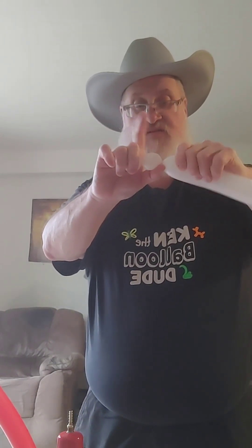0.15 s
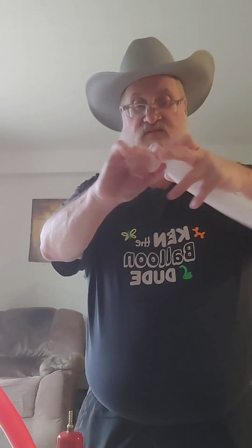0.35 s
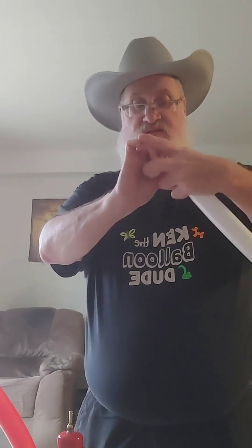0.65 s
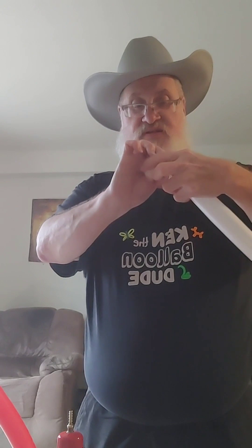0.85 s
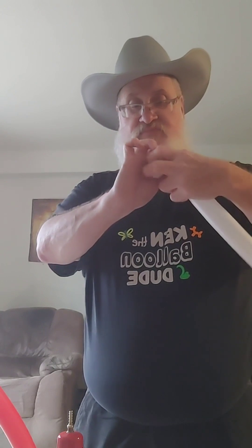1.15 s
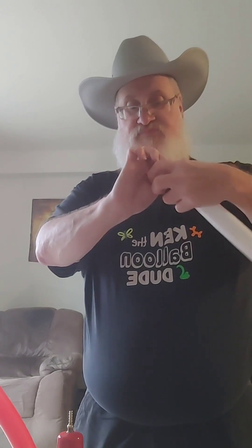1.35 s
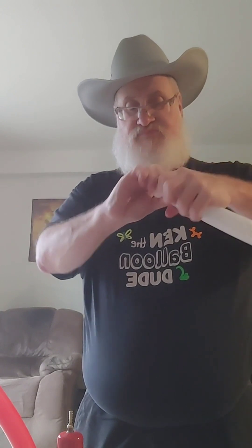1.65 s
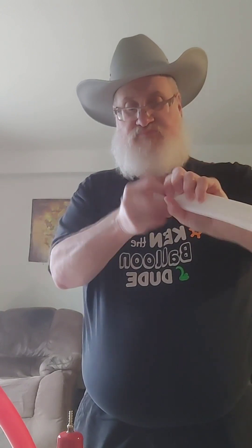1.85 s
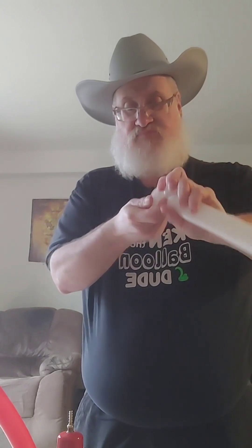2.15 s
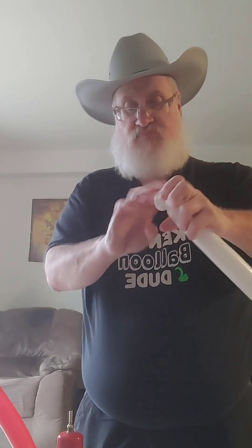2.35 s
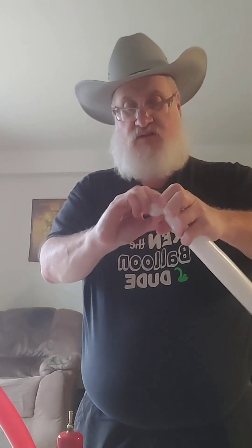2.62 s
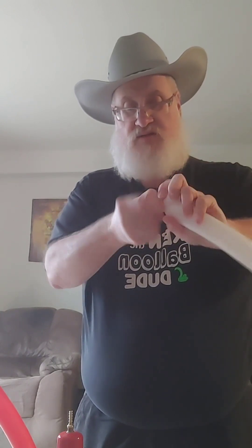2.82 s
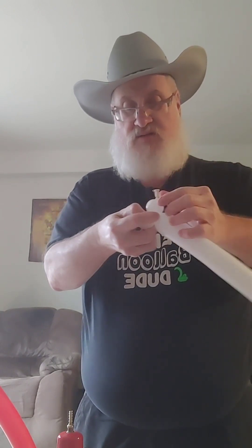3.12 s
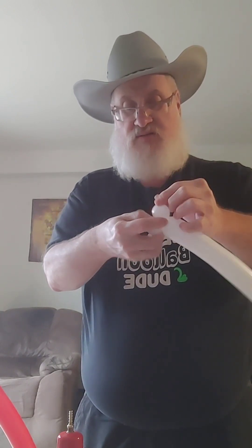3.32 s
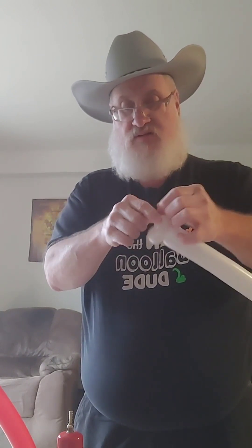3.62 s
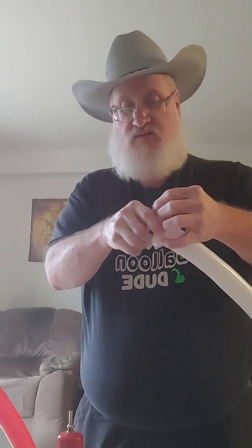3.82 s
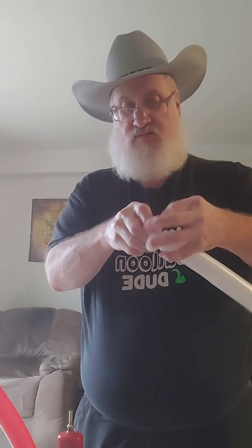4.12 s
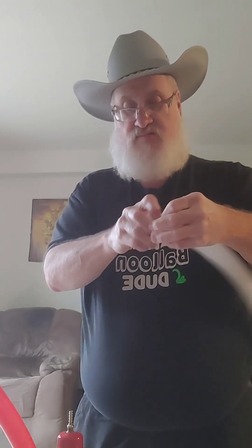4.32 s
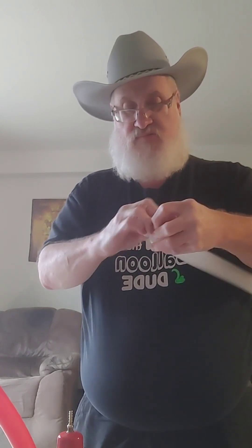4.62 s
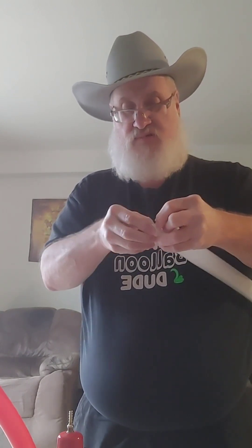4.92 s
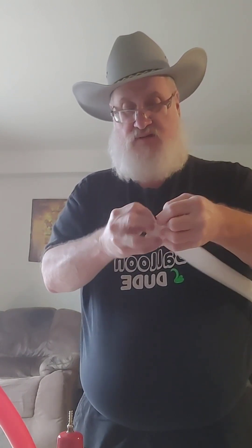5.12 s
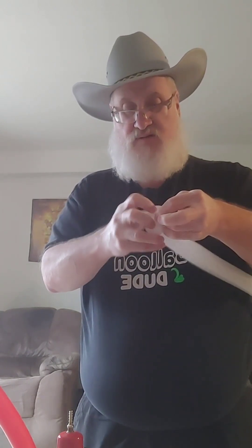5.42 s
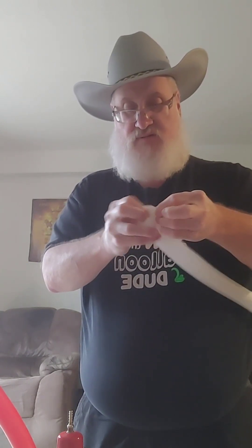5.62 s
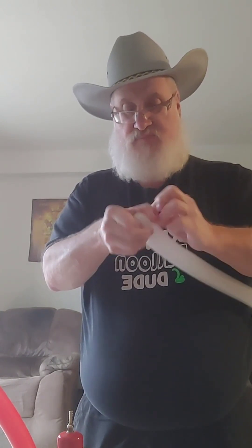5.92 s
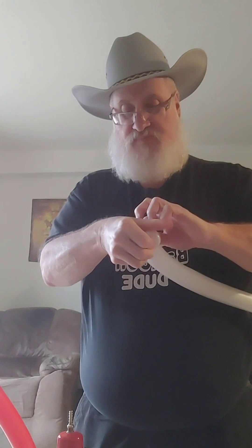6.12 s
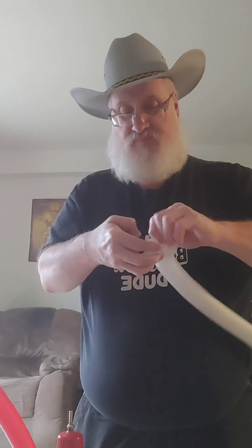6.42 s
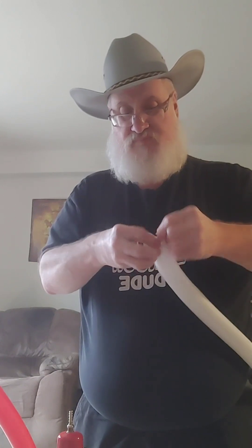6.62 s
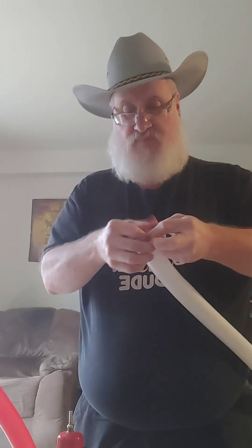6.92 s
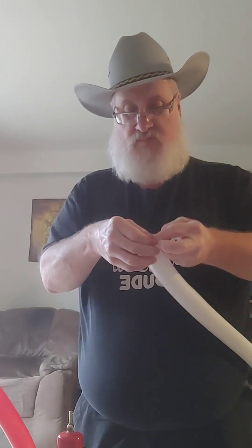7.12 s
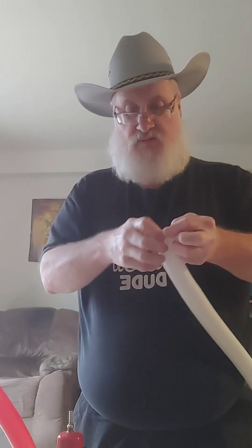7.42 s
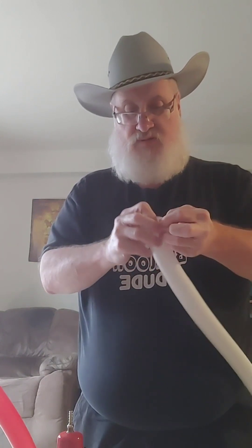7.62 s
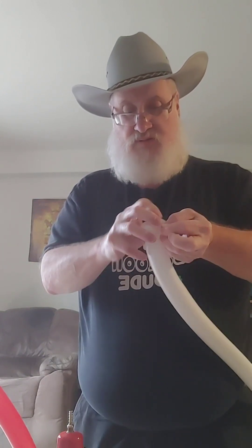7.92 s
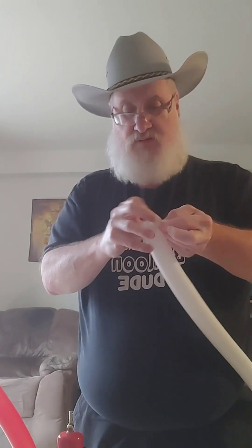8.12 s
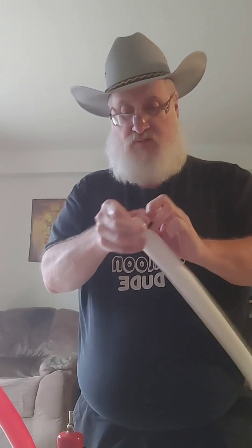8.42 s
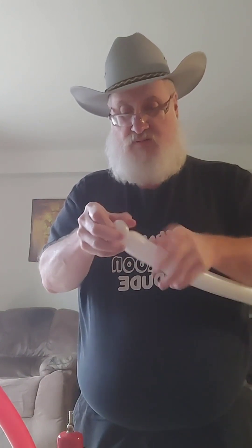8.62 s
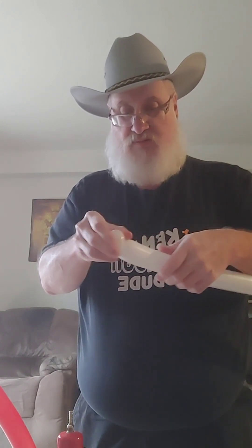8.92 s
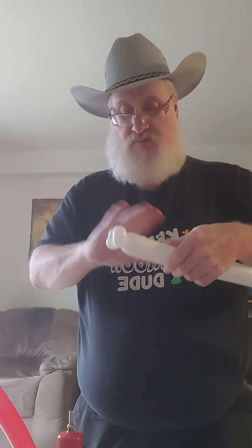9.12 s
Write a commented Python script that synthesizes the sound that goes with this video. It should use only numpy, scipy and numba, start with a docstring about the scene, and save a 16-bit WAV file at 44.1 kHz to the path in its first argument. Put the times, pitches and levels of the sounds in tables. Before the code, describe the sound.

Close stereo pickup of a long latex balloon being twisted and knotted by hand in a small, lightly echoing living room. From 0 to 2.2 s, short scratchy rubs follow one another several times a second, fairly loud, mid-pitched and hollow, with snaps at about 0.2, 1.0, 1.6 and 2.0. A brief lull near 2.3 leads to more rubs and a cluster of snaps from 2.4 to 3.3. Around 3.4 to 3.7 it thins out to faint creeping and tiny high squeaks. From 3.9 to 8.4 the strokes are lighter, drier and crisper, irregular, with rubbery creaks and sharper snaps near 4.2, 5.2, 6.7 and 8.2. At 8.5 the strongest snap comes with a short low yelp, then small chirps and rubs until 9.0. It fades almost to silence, with a last faint rustle after 9.2. Very quiet room air and barely audible hum run underneath.

```python
"""Long latex balloon twisted and knotted by hand in a living room.
Fingers stick and slip on the taut skin: random slip trains drive skin, air tube and creases (scratchy strokes).
Single jerks give snaps, quick runs of them creaks; gliding tones give a few short squeals.
Ceiling and walls answer with echoes, a diffuse tail and standing waves.
Shaped noise and two wavering tones add room air and a faint electric hum."""
import sys
import numpy as np
from scipy import signal
from scipy.fft import rfft, irfft, next_fast_len
from scipy.io import wavfile
from scipy.ndimage import uniform_filter1d, map_coordinates
from numba import njit

SR = 44100
rng = np.random.default_rng(int(sys.argv[2]) if len(sys.argv) > 2 else 0)


def store_wav(level_fs):
    """Save 16-bit WAV to argv[1]."""
    pcm = np.round(np.clip(np.atleast_2d(level_fs), -1, 1) * 32767)
    wavfile.write(sys.argv[1], SR, pcm.T.astype(np.int16))


N = 408220

# finger strokes: (start [s], length [s], relative rubbing level at mid-stroke [dB], swell start to end [dB],
# air tube drive [dB], sharpness = crease drive [dB], resonance of the gripped patch [Hz],
# low panel drive [dB], high panel drive [dB]); drives are relative to the rubbing level
STROKES = [(0.066, 0.068, -35.0, 10, -3.5, -2.5, 1910, -9, -18),
           (0.183, 0.033, -38, -3, -2, -0.34, 1880, -17, -5),
           (0.216, 0.086, -47.5, -9, 3, 0.01, 1440, -16, -20),
           (0.302, 0.055, -57.0, -2, -2, -2, 1250, 0, -18),
           (0.378, 0.12, -50.5, -1, -24, -6, 2153, -6, -27),
           (0.502, 0.044, -51.0, 1, -15, 0.76, 2162, -1, -7),
           (0.549, 0.019, -46, -1, -1, -1.5, 1116, -21, -6),
           (0.61, 0.035, -53.0, 0, -20, 2.5, 1987, -4, -7),
           (0.681, 0.037, -38.0, -1, -19, -6.0, 1650, -19, -10.5),
           (0.758, 0.039, -41.5, 9, -29, -6, 1359, -6, -9),
           (0.813, 0.076, -45.5, 1, -10, -2.0, 1910, -2, -8),
           (0.917, 0.061, -41.5, -3, -17, -6, 1650, -16, -6),
           (0.984, 0.037, -35.5, -3, -4, -8.0, 1110, -12, -16),
           (1.027, 0.087, -52, 0, -8, -6, 1806, -2, -9),
           (1.13, 0.065, -40.5, 2, -36, -5.5, 1903, -2, -10.5),
           (1.185, 0.055, -44, -0.5, -7, -3.5, 1449, -20, -6),
           (1.252, 0.095, -49, 7, -39, 1.0, 2343, -6, -7.5),
           (1.388, 0.07, -46, 3, -37, -23, 2443, -5.5, -35),
           (1.492, 0.057, -41.5, 3, -16, -4, 1784, -14, -8),
           (1.535, 0.025, -44.5, 2, -4, -4.5, 1514, 3.5, -11),
           (1.598, 0.032, -42, -6, -22, -12.0, 1505, -15, -19),
           (1.646, 0.033, -46.0, 2, -29, -0.35, 1900, -9, -20),
           (1.683, 0.063, -52.0, 1, -31, 4.5, 2270, -3, -19),
           (1.74, 0.13, -55.5, 4, -20, -1.44, 2525, 1.5, 2),
           (1.894, 0.062, -50.5, -3, -24, 0.72, 2012, -4, -8),
           (1.972, 0.11, -38.0, 4, -9.5, -2.5, 1757, -8, -11),
           (2.095, 0.1, -45, -11, -11, -1.5, 2310, 0, -5),
           (2.176, 0.075, -45.5, 10, -1.5, -0.85, 1697, -8, -7),
           (2.447, 0.041, -39.5, 3.5, -4, -7, 1610, -22, -11),
           (2.511, 0.015, -50.5, -6, -3, 15, 2199, -12, -17),
           (2.61, 0.12, -48, 10, -31, 1.2, 2448, -24, -11), (2.735, 0.072, -54, 11, -5, 2.5, 1909, 3, -12),
           (2.9, 0.054, -38.5, 2, -19, -6, 2245, -11.5, -10),
           (3.106, 0.077, -51, -3, -8, 3.5, 1949, -3, -18), (3.213, 0.087, -56, 13, -27, 5, 2329, 0.5, -9),
           (3.339, 0.1, -54.5, -4, -40, -1.16, 2282, -4.5, -20),
           (3.725, 0.041, -50.0, 8, -4, -0.43, 2693, -8, -0.5),
           (3.799, 0.04, -54.0, 0, -17, -2.5, 2685, -29, -20),
           (3.878, 0.039, -52.0, 1, -16, -1.67, 2650, -27, 2.5),
           (3.95, 0.077, -53.5, -2.5, -1.5, 4.5, 2780, -26, 2),
           (4.081, 0.2, -57.5, 2, 2, 11, 2583, -10, 0.5), (4.292, 0.1, -56, -7.5, -22, 9.0, 2203, -5, -6),
           (4.403, 0.062, -44, 1, -15, 7.5, 2426, -2.5, 0),
           (4.474, 0.093, -53, -4, -10, 5.5, 2200, -3, 2.5),
           (4.618, 0.02, -54.0, -0.5, -13, 4.5, 2089, -1, 4),
           (4.637, 0.064, -47, 2, -10.5, 3.5, 2423, -0.5, -2),
           (4.73, 0.052, -44, -2, -25, 3.5, 2574, -3.5, -3),
           (4.837, 0.041, -48, -1, -13, -2.5, 2075, -4, -9),
           (5.052, 0.055, -50.0, 2, -19, 7.5, 2505, -15, 2.5),
           (5.14, 0.07, -51.0, 5, -23, 2.01, 2710, -7, -4),
           (5.228, 0.095, -46.0, -5, -15, 4.5, 2827, -32, -16),
           (5.451, 0.033, -55, -0.5, -28, 3.5, 2313, -12, -2),
           (5.514, 0.054, -44, -3, -14.5, 0.5, 1901, -19, -6.5),
           (5.595, 0.04, -50.5, 0, -8, -5.5, 2100, -11, -19),
           (5.644, 0.11, -49.5, 1, -16, 3.5, 2300, -22, -14),
           (5.743, 0.083, -45, -2.5, -6.5, 2.5, 1984, -17, -11),
           (5.974, 0.11, -56, 0.5, -14, 1.12, 2399, -10, -5.5),
           (6.091, 0.04, -47.5, 3, -22, -3.5, 2559, -7, -8),
           (6.191, 0.035, -51.5, 0, -8, -8.5, 2444, -2, -12),
           (6.225, 0.025, -47.0, -2.5, -23, -7.5, 2448, -22, -26),
           (6.287, 0.14, -56.0, 1, -9, -0.5, 2249, -13, -15),
           (6.434, 0.13, -59.5, -6, -12, 9, 2632, -1, -2),
           (6.59, 0.099, -55.5, -9, -35.5, 5, 2764, -8, -11),
           (6.68, 0.087, -51.5, -13, -13, 7, 2318, 2, -1),
           (6.761, 0.067, -47.5, -2, -15, 6.5, 2120, -5, -3),
           (7.044, 0.043, -52.5, -9, 3.5, -6.0, 2400, 0, 3),
           (7.122, 0.033, -49.5, 3, -14, -0.2, 2319, -12, -16),
           (7.171, 0.061, -53, -1.5, -1.5, -1.17, 2005, 2, -1),
           (7.262, 0.04, -58.0, 0, -21, 2.5, 2696, -7, 7),
           (7.397, 0.038, -59.5, -3, -7.5, 9.5, 2446, -20.5, -11),
           (7.546, 0.076, -55.0, 9, -0.5, -8.5, 2373, -3, -19),
           (7.644, 0.044, -50, 2, -4, 1.93, 2401, -3, 1),
           (7.699, 0.097, -46.0, 1.5, -12, 2.5, 2202, -6, -4.5),
           (7.813, 0.033, -46.5, -1.5, -19, 1.5, 2498, -6, -9),
           (7.869, 0.034, -53.5, -2.5, -24, 10.5, 2400, -18, 1),
           (7.946, 0.036, -58.0, 0, -17, 8.5, 2511, -17, -3),
           (8.03, 0.073, -55, 2, -11, -9.5, 1999, -2, -22),
           (8.118, 0.11, -51.5, 10, -10, 4, 2381, 0.5, -11),
           (8.272, 0.029, -46.5, 3.5, -2.5, -3.5, 2480, -18, -12),
           (8.346, 0.14, -51.5, -5, -8.5, 0.33, 2104, -5, -6),
           (8.494, 0.085, -43.0, -18, 0.5, -7.5, 1399, -7, -11),
           (8.591, 0.054, -45.5, -13, -7, 2.4, 2783, -23, -3.5),
           (8.66, 0.047, -53.5, 0, -8, 0.2, 2581, -25, -11),
           (8.778, 0.043, -48, -2, -19, -12.5, 1445, -14, -3),
           (8.887, 0.031, -48.5, -1.5, -6, 1, 1899, 0, -3),
           (8.991, 0.0087, -50, -1, -37, 1.5, 2677, -32, -28)]
ATTACK_S, RELEASE_DB_PER_S = .012, 600  # a finger takes hold, and lets go
# light creeping of the holding fingers: (time [s], relative level [dB])
CREEP_LEVEL = [(0.0, -53.0), (1.45, -57.0), (1.95, -55.0), (2.25, -45.0), (2.29, -85.0), (2.42, -69),
               (2.5, -59.0), (3.42, -56.0), (3.52, -73), (3.62, -68), (3.68, -61), (3.8, -55.0),
               (4.9, -55.0), (4.99, -62.0), (5.1, -60.0), (5.4, -60.0), (6.9, -59.0), (7.34, -57),
               (7.44, -66), (7.5, -57), (8.62, -55), (8.73, -63.5), (8.84, -57), (9.01, -59.5),
               (9.06, -85.5), (9.2, -74.5), (9.26, -51.5)]
CREEP_TUBE_DB, CREEP_SHARP_DB, CREEP_HZ = -13.5, -0.5, 2140  # tube drive, sharpness, patch resonance
CREEP_SWING_DB, CREEP_SHIFTS_PER_S = 3, 22  # random shifts of the grip
# creeping drive of each panel: (low [dB], high [dB])
CREEP_PANELS_DB = [-12.5, -12.5]
# slip rate at one rubbing level and 0 dB sharpness; rises in level and in sharpness that double it
SLIPS_PER_S, SLIPS_AT_DB, DOUBLING_DB, SHARP_DOUBLING_DB = 295, -47, 26, 7
# stretched skin panels beside the grip: (resonance [Hz], damping [0-1], relative level [dB])
SKIN_PANELS = [(1494, 0.3, -3), (4083, 0.28, 2)]
# response of the skin: (frequency [Hz], relative level [dB])
SKIN_SPECTRUM = [(100, -34.5), (600, -70), (950, 11.5), (1400, 8.5), (1820, 2.5), (2300, 9), (2850, 12),
                 (3600, 0.5), (5000, -13), (10000, -60.5)]
# response of the air tube: (frequency [Hz], relative level [dB])
TUBE_SPECTRUM = [(30, -33), (200, -23), (320, -11.5), (430, 2.5), (520, 6), (630, 3), (780, -3.5),
                 (1050, 7.5), (1350, -95.5), (2500, -37.5)]
# response of the creases under rubbing: (frequency [Hz], relative level [dB])
CREASE_SPECTRUM = [(800, -89.5), (2300, -7.5), (3100, -24), (3800, -0.5), (4700, -6.5), (6500, -1.5),
                   (8000, -8), (9200, -16.5), (11600, -10), (12800, -18), (16000, -32.5)]

# snaps, single large slips: (time [s], relative level on the taut skin [dB], then relative to it:
# air tube [dB], creases [dB], push of air [dB])
SNAPS = [(0.1475, -21, 0, -24, -49.5), (0.179, -13, -10, -5, -31), (0.1913, -16, -5, -9, -43),
         (0.5605, -30.5, -10, -8, -40), (0.621, -27.5, -45, -3, -22), (0.6715, -36, -29, -8, -45),
         (0.988, -20, -6, -11, -45), (1.0077, -25, -1, -2, -46), (1.5456, -23, -5, -16, -41),
         (1.5548, -21, -7, 1, -38), (1.5478, -25, -9, -7, -41), (1.6019, -20.5, -7.5, -9, -53),
         (1.6028, -20, -12, -8.5, -50), (1.6779, -19.5, -35, -0.5, -45), (1.693, -22, -29.5, 0.5, -43),
         (1.7086, -21.5, -38, -1.5, -43), (2.0126, -30.5, -27, 18, -5), (2.1523, -28.5, -11, 7.5, -35),
         (2.435, -27, -9, -14, -27), (2.483, -20, -7, -16, -30), (2.613, -36, -8, 17.5, -15),
         (2.6962, -32, -30, -16, -42), (2.7145, -15.5, -19, 0.5, -22), (2.7746, -17, -17, 2, -30),
         (2.8659, -26, -38, -4, -42), (2.9002, -34, -37, -12, -44), (2.9058, -33, -26, -9, -44),
         (2.9202, -27.5, -19, -4, -41), (2.9347, -29, -24, -18, -44), (3.0691, -25, -17, 8, -17),
         (3.2038, -23, -11.5, -6, -43), (3.3294, -26, -46, -9, -44.5), (3.9607, -32, -15, 11.5, -30),
         (3.9757, -44, -10, 15, -36.5), (4, -37.5, -11, 16, -21), (4.0238, -36, -12, 0, -28),
         (4.0506, -29, -32, 6, -40), (4.1733, -16.5, -15, 2.5, -17), (4.3087, -29, -13, 9.5, -28),
         (4.36, -33, -21, 12, -10), (4.4204, -28.5, -25, 2.5, -37), (4.4372, -21, -31, 2, -18),
         (4.4463, -22.5, -17, -2, -29), (4.6663, -23, -23, 6.5, -25.5), (4.718, -26, -25, -7, -42),
         (4.7277, -23.5, -22, -5.5, -43.5), (4.9391, -27, -35, -3.5, -36.5), (5.1032, -33, -31, -4, -37.5),
         (5.2115, -14, -15.5, 3, -18.5), (5.6208, -31, -14, -14, -40), (5.6426, -29, -12, 3.5, -37),
         (5.687, -24, -27, -2.5, -50), (5.692, -21, -41, 2, -50), (5.6963, -32, -32, -2, -45),
         (5.7754, -26.5, -16, -1, -36), (5.826, -35, -10, 13.5, -16), (5.8681, -29, -12, 4.5, -23),
         (5.899, -24.5, -10, -6.5, -28), (5.9093, -29, -5, -1, -38), (6.2295, -35, -24, -5, -40),
         (6.3603, -34, -18, -11, -33), (6.4197, -43, -25, 6.5, -40), (6.4455, -22, -39, 0.5, -51),
         (6.595, -31.5, -39.5, 10.5, -32), (6.525, -35, -35, 7, -40), (6.6118, -44, -34, -5, -40),
         (6.6238, -38, -33, -5, -41.5), (6.6488, -26.5, -31, 7, -38), (6.6842, -11, -22.5, 1, -34),
         (6.784, -21.5, -16.5, 10.5, -23), (7.0073, -32.5, -18, -3.5, -40), (7.0495, -34, -6, -11, -40),
         (7.0639, -26, -24, 1.5, -22), (7.218, -23.5, -19, 5, -48), (7.2233, -27.5, -20, 6.5, -40),
         (7.5856, -39, -20, -8.5, -40), (7.613, -30, -25, -5.5, -38), (7.6449, -26, -18, -7, -36),
         (7.6928, -24.5, -18, -5.5, -36), (7.7103, -23, -28, -7.5, -35), (7.8772, -28.5, -28, 1, -38),
         (7.9851, -29.5, -14, -8, -40), (8.0168, -35.5, -19, -13, -40), (8.0588, -29.5, -28, -8, -42),
         (8.1194, -17.5, -41, -7.5, -49), (8.134, -18.5, -28, 5, -46), (8.1964, -19, -35, -3, -45),
         (8.2483, -13.5, -24, 5.5, -26), (8.3961, -29.5, -15, -7, -37.5), (8.483, -8, -6, -16, -30.5),
         (8.4859, -13, -3.5, -4.5, -39), (8.6501, -41, -19, 1, -40), (8.8948, -21.5, -22, -10.5, -40),
         (9.0054, -40, -20, 0, -40)]
# response of a taut fold before tilting: (frequency [Hz], relative level [dB])
FOLD_SPECTRUM = [(100, -65), (650, -22.5), (1050, -1), (1400, 7), (1850, 0), (2300, 8), (2680, 10.5),
                 (3150, 4.5), (4000, 4.5), (10000, -80.5)]
# crack of the creases in a snap: (frequency [Hz], relative level [dB])
CRACK_SPECTRUM = [(800, -62.5), (2300, -9.5), (3100, -8.5), (3800, -1), (4700, -1), (6500, -0.5),
                  (8000, -3.5), (9200, -11.5), (11600, -8), (12800, -19.5), (16000, -27)]
# puff of air from a snap: (frequency [Hz], relative level [dB])
PUFF_SPECTRUM = [(20, -32), (60, -29), (130, -22.5), (260, -22), (420, -30), (900, -19.5), (2000, -53.5)]
# creaks, quick runs of slips: (start [s], length [s], rate [slips/s], relative base level on the skin [dB],
# air tube relative to the skin [dB])
CREAKS = [(0.134, 0.026, 250, -23, -9.5), (0.207, 0.017, 210, -31, -15), (0.759, 0.036, 170, -30.5, -10),
          (1.176, 0.049, 140, -33, -24), (1.62, 0.037, 160, -36, -15), (2.05, .04, 167, -28, -8),
          (2.444, 0.051, 145, -34.5, 2), (3.882, 0.033, 244, -41, -25), (4.491, 0.019, 210, -34, -19),
          (4.68, .026, 169, -36.5, -21), (4.847, 0.043, 222, -31, -19.5), (5.749, 0.025, 170, -26, -16),
          (5.811, 0.0221, 205, -35, -10.5), (5.916, 0.027, 110, -30, -6.5), (6.29, .035, 135, -39.5, -10),
          (6.9266, 0.038, 190, -30.5, -7.5), (7.18, 0.019, 129, -32, -15), (7.3195, 0.032, 141, -30.5, -13),
          (7.49, 0.033, 121, -33, -7.5), (7.641, 0.037, 166, -32, -19.5), (7.698, 0.11, 202, -30.5, -12),
          (7.818, 0.029, 230, -30, -19), (8.297, 0.019, 180, -30, -12), (8.784, .042, 130, -43, -17),
          (8.886, 0.028, 201, -30, -4.5)]
CREAK_CREASE_DB, CREAK_PUSH_DB = -5.5, -41  # relative to the skin
# slips locked to a tone: (start [s], length [s], first pitch [Hz], last pitch [Hz],
# relative level [dB], roughness [factor])
SQUEALS = [(0.133, 0.02, 946, 950, -32.5, 0.57), (0.765, 0.018, 1110, 1290, -41, 0.86),
           (0.875, .022, 1326, 1407, -42, 0.22), (0.989, 0.037, 1129, 1003, -38.5, 0.87),
           (1.142, 0.0096, 2060, 2490, -35, 0.66), (1.159, 0.011, 2356, 1930, -37, 0.95),
           (1.198, 0.0058, 1350, 1380, -35, 0.2), (2.038, 0.04, 1183, 1419, -43, 0.59),
           (2.235, 0.022, 964.5, 783, -45.5, 0.86), (2.235, 0.031, 330.6, 351.7, -54.5, 0.06),
           (2.8, 0.054, 510.3, 458, -63, 0.03), (3.02, 0.02, 1298, 1423, -51, 0.18),
           (3.537, 0.15, 2222, 2536, -91, 1.12), (3.58, 0.017, 2500, 2806, -51, 0.64),
           (3.651, 0.027, 2600, 2644, -53.5, 0.4), (3.749, 0.023, 2450, 2658, -41, 0.73),
           (3.967, .011, 3890, 4180, -40, 0.53), (3.987, .003, 2900, 3100, -36, 0.3),
           (4.001, 0.0057, 4080, 4300, -37, 0.35), (4.051, 0.0027, 2905, 4360, -30.5, 0.44),
           (4.233, .024, 1121, 1050, -54, .4), (4.33, 0.021, 1385, 1497, -51, 0.42),
           (4.748, .018, 2886, 2211, -41, 1.24), (4.768, 0.017, 2390, 2230, -43.5, 0.2),
           (5.538, 0.098, 1297, 1501, -55.5, 0.36), (7.132, .012, 2057, 2400, -50.5, 0.79),
           (7.138, .014, 3717, 4090, -44, 0.89), (7.93, 0.019, 1121, 1230, -52, 0.3),
           (8.355, 0.02, 407.1, 475.3, -50, 0.23), (8.481, .016, 530, 480.4, -29.5, .5),
           (8.487, 0.051, 320, 292, -50.5, 1), (8.499, 0.027, 458, 417, -37.5, 0.56),
           (8.533, .03, 450, 397, -46, .8), (8.524, 0.025, 1014, 1070, -41.5, 0.77),
           (8.565, 0.026, 780, 830, -55, .2), (8.501, 0.015, 710.2, 769.6, -35, .5),
           (8.667, 0.045, 2531, 2810, -46, 0.4), (8.728, 0.027, 394.8, 448.6, -52.5, 0.29),
           (8.762, 0.00865, 600, 635, -51, 0.81), (8.78, .014, 440, 454, -45.5, 0.3),
           (8.793, 0.0294, 511, 560, -49.5, 1.14), (8.812, .014, 628, 680, -43, 0.27),
           (8.841, 0.024, 672, 615, -50, 0), (8.89, 0.023, 558, 488, -46.5, 0.4)]

# ceiling and wall echoes: (mean delay [ms], left level [dB], right level [dB], lag at the right port [ms])
ECHOES = [(5.047, -5.5, -12, 0.49), (8.3, -6.5, -12, 0.2), (11.995, -6, -10.5, 0.6),
          (15.76, -10, -18.5, 0.15), (17.64, -51, -31, 0.4), (19.72, -11.5, -35, 0.25),
          (27.3, -10, -24, 0.2)]
# decay of the diffuse tail: (frequency [Hz], t60 [s])
ROOM_T60 = [(200, 0.032), (800, 0.24), (2200, 0.12), (5500, 0.25), (12000, 0.088)]
# standing waves between the walls: (frequency [Hz], gain [dB], t60 [s])
WALL_MODES = [(385, -2, .15), (417, 3, .24), (463, 2, .17), (529, -4, .2), (634, -8, .25), (710, -8, .25),
              (764, -2, .3)]
# spectrum of the room air: (frequency [Hz], relative level [dB])
AIR_SPECTRUM = [(15, 0), (25, -18.5), (264, 1.5), (354, 2), (749, -3), (1670, -22.5), (2780, -20.5),
                (5140, -36), (9270, -20), (10000, -22), (15000, -35)]
# hum tones: (frequency [Hz], relative level [dB])
HUM_TONES = [(120, -85), (243.5, -75)]
# colour of the left microphone port: (frequency [Hz], gain [dB])
LEFT_COLOUR = [(200, 0), (500, 0), (700, -1), (1150, 0), (1430, -5), (1650, 0), (2150, 0), (2600, -3),
               (3700, 2), (4500, -2.5), (5000, -.5), (6000, -7.5), (8000, -1), (9200, -4), (11600, -.5)]
# colour of the right microphone port: (frequency [Hz], gain [dB])
RIGHT_COLOUR = [(200, 0), (520, -1), (1120, 0), (1460, 7), (1850, -4), (2550, 6), (3400, -1), (4350, 4),
                (5300, 0), (6400, 5), (8200, -10), (11600, -5), (13000, -12), (16000, -24)]
TOP_HZ = 16000  # band limit


def rubbing(skin_db=-7, patch_db=-10, sing_db=-8, tube_db=-6.5, crease_db=-3, fizz_db=0, fold_hz=5400):
    """Slips drive skin and gripped patch; a loose grip lets the air tube sound, a tight one the creases."""
    skin_damping, patch_damping = 1.0, .25
    patch_wander, fold_wander, fold_share = .15, .3, .45

    def moving_ring(x, hz, damping):
        step = 2 * np.pi * np.clip(hz, 500, 8000) / SR
        return unit(resonate(x, step, damping))

    drive, tension_hz = fingers()
    slips = stick_slip(drive[0], drive[2] / drive[0])
    fizz = slips + amp(fizz_db) * rng.standard_normal(N)  # countless tiny creases blur the treble
    skin = unit(through(slips, ring(SKIN_SPECTRUM)))
    tube = unit(through(slips, ring(TUBE_SPECTRUM)))
    crease = unit(through(fizz, ring(CREASE_SPECTRUM)))

    # tension sets the pitch of the patch; the skin around it rings more broadly
    patch = moving_ring(skin, tension_hz * np.exp(patch_wander * wobble(90)), patch_damping)
    membrane = amp(skin_db) * moving_ring(skin, tension_hz, skin_damping)
    membrane += amp(patch_db) * patch
    membrane += amp(sing_db) * singing(tension_hz)

    # small folds ring higher and change fast
    folds = moving_ring(crease, fold_hz * np.exp(fold_wander * wobble(140)), patch_damping)
    crease = unit(crease + fold_share * folds)

    out = drive[0] * membrane
    out += drive[1] * amp(tube_db) * tube
    out += drive[2] * amp(crease_db) * crease
    return out + panels(slips, drive[3:])


def fingers():
    """Powers of strokes and creeping add into five drives; patch pitch is their power-weighted mean."""
    t = np.arange(N) / SR
    swing_db = CREEP_SWING_DB * np.tanh(wobble(CREEP_SHIFTS_PER_S))
    creep = amp(np.interp(t, *np.transpose(CREEP_LEVEL)) + swing_db) ** 2
    # rows: skin, air tube, creases, low panel, high panel
    creep_db = np.array([0, CREEP_TUBE_DB, CREEP_SHARP_DB, CREEP_PANELS_DB[0], CREEP_PANELS_DB[1]])
    power = creep * amp(creep_db[:, None]) ** 2
    weighted_hz = creep * CREEP_HZ
    age = t[:SR // 2]
    for s, length, db, swell_db, tube_db, sharp_db, hz, low_db, high_db in STROKES:
        hold_db = db + swell_db * (np.minimum(age / length, 1) - .5)
        release_db = RELEASE_DB_PER_S * np.maximum(age - length, 0)
        attack = np.minimum(age / ATTACK_S, 1)
        stroke = (attack * amp(hold_db - release_db)) ** 2
        for row, part_db in zip(power, (0, tube_db, sharp_db, low_db, high_db)):
            add(row, s, stroke * amp(part_db) ** 2)
        add(weighted_hz, s, stroke * hz)
    return np.sqrt(power), weighted_hz / power[0]


def stick_slip(effort, sharpness, scatter=.3, size_db=4, tear=0.54, clump_db=3.0, clump_rate=60):
    """Uneven slips, each a jerk and a short tearing burst, levelled to steady power, then clumped."""
    tear_s, hiss, slowest_per_s, fastest_per_s = .0009, .17, 150, 1500
    doublings = (20 * np.log10(effort) - SLIPS_AT_DB) / DOUBLING_DB
    doublings += 20 * np.log10(sharpness) / SHARP_DOUBLING_DB  # a tight, sharp grip slips faster
    rate = np.clip(SLIPS_PER_S * 2 ** doublings, slowest_per_s, fastest_per_s)
    rate = rate * np.exp(scatter * wobble(40) + scatter * wobble(400))
    at = np.flatnonzero(np.diff(np.floor(np.cumsum(rate) / SR)))

    jerks = np.zeros(N)
    uneven_db = size_db * 2 ** (-np.clip(doublings, -1, 1) / 2)  # slow slips differ more in size
    jerks[at] = amp(uneven_db * np.clip(rng.standard_normal(N), -2, 2))[at]
    tear_decay = np.exp(-np.arange(SR // 100) / SR / tear_s)
    tearing = through(jerks, tear_decay) * rng.standard_normal(N)
    slips = jerks + tear * tearing

    power = uniform_filter1d(uniform_filter1d(slips ** 2, size=900), size=600)
    steady = slips / np.sqrt(np.abs(power) + 1e-6)
    clumps = amp(clump_db * np.tanh(wobble(clump_rate)))
    return (steady + hiss * rng.standard_normal(N)) * clumps


def singing(tension_hz):
    """Gripped latex breaks into tiny squeaks that slide around the pitch of the patch."""
    glide, glides_per_s, rough, bursts_per_s = .2, 110, .09, 90
    hz = tension_hz * np.exp(glide * wobble(glides_per_s) + rough * wobble(1500))
    phase = 2 * np.pi * np.cumsum(hz) / SR
    tone = np.sin(phase) + np.sin(2 * phase) / 2
    bursts = 1 + np.tanh(wobble(bursts_per_s))
    return unit(through(tone * bursts, ring(SKIN_SPECTRUM)))


def panels(slips, drives, wander=0.11, flicker_db=5.0, flickers_per_s=130):
    """Slips shake two panels in varying proportion; their pitch drifts as the skin is stretched."""
    out = np.zeros(N)
    for (hz, damping, db), drive in zip(SKIN_PANELS, drives):
        step = 2 * np.pi * hz * np.exp(wander * wobble(45)) / SR
        loss = np.clip(damping, .1, 1)
        ringing = resonate(resonate(slips, step, loss), step, loss)
        flicker = amp(flicker_db * np.clip(wobble(flickers_per_s), -2, 2))
        out += drive * amp(db) * unit(ringing * flicker)
    return out


@njit
def resonate(x, step, damping):
    """A resonance of steady gain whose frequency (radians a sample) moves."""
    out, low, band = np.zeros(len(x)), 0.0, 0.0
    for i in range(len(x)):
        low += step[i] * band
        band += step[i] * (x[i] - low - damping * band)
        out[i] = band / np.sqrt(step[i])
    return out


def snaps(skin_db=9, tube_db=7.0, crease_db=9, push_db=9, spread_ms=1.225, grain_hz=1400, size=2048, count=256):
    """A stretched fold lets go at once: one hard jerk that also pushes the air; creaks are small snaps."""
    out, hz = np.zeros(N), np.fft.rfftfreq(size, 1 / SR)
    air_tube, creases, puff = ring(TUBE_SPECTRUM), ring(CRACK_SPECTRUM), ring(PUFF_SPECTRUM)
    crumple_s = .0005
    age = np.arange(count) / SR / crumple_s
    # the creases give way in a very short burst
    crumples = rng.standard_normal((count, count)) * age * np.exp(-age)
    latenesses = rng.random((count, count))
    # at most count snaps sound
    for (s, db, tube, crease, push), lateness, crumple in zip(SNAPS + creaks(), latenesses, crumples):
        # the jerk runs round the skin, so each frequency leaves it a little earlier or later
        late_ms = spread_ms * np.interp(hz / grain_hz, np.arange(count), lateness)
        jerk = irfft(np.exp(-2j * np.pi * np.cumsum(late_ms / 1000) * hz[1]))
        parts = (
            (air_tube, tube + tube_db),
            (fold(crease), skin_db),
            (through(creases, crumple), crease + crease_db),
        )
        for response, part_db in parts:
            sound = through(jerk, response)[:size // 2]
            add(out, s, amp(db + part_db) * sound / np.linalg.norm(sound))
        add(out, s, amp(db + push + push_db) * puff / np.linalg.norm(puff))
    return out


def fold(crease_db, tilt_per_db=0.5, neutral_db=-3, steepest_db=10):
    """Ring of a taut fold: sharper creasing tilts it to the treble (dB per octave)."""
    tilt = np.clip(tilt_per_db * (crease_db - neutral_db), -steepest_db, steepest_db)
    return ring([(hz, db + tilt * np.log2(hz / 1000)) for hz, db in FOLD_SPECTRUM])


def creaks(size_db=2, arch_db=8, count=32):
    """A dragging finger catches and lets go nearly evenly: rows of small snaps, strongest in mid-run."""
    rows, scatter = [], .07
    for s, length, rate, db, tube in CREAKS:
        gaps, sizes = rng.standard_normal((2, count))
        ages = np.append(0, np.cumsum(np.exp(scatter * gaps)) / rate)
        arch = arch_db * (np.sin(np.pi * ages / length) - np.pi / 4)
        for age, swell, z in zip(ages, arch, sizes):
            if age < length:
                rows.append((s + age, db + swell + size_db * z, tube, CREAK_CREASE_DB, CREAK_PUSH_DB))
    return rows


def squeals(level_db=-2, overtone_db=-14, waver=0.148):
    """For a moment the slips lock to one pitch, which glides with the tension."""
    out, unrest = np.zeros(N), wobble(600)
    for s, length, first_hz, last_hz, db, rough in SQUEALS:
        u = np.linspace(0, 1, int(length * SR))
        glide_hz = first_hz + (last_hz - first_hz) * u
        hz = glide_hz * (1 + waver * rough * unrest[int(s * SR):][:len(u)])
        phase = 2 * np.pi * np.cumsum(hz) / SR
        tone = np.sin(phase) + amp(overtone_db) * (np.sin(2 * phase) + np.sin(3 * phase) / 2)
        envelope = np.sqrt(np.abs(np.sin(np.pi * u)))
        add(out, s, amp(db + level_db) * unit(tone * envelope))
    return out


def room(x, size=6144):
    """The hands keep moving, so the echo pattern changes: overlapping pieces, each with new paths."""
    hop = size // 2
    out, padded = np.zeros((2, N + size)), np.pad(x, size)[hop:]
    for start in range(0, N + hop, hop):
        piece = padded[start:start + size] * signal.get_window("hann", size)
        for port, path in zip(out, paths()):
            add(port, start / SR, signal.fftconvolve(piece, path))
    return out[:, hop:][:, :N]


def paths(lead_ms=0.07, sway_ms=0.18, tail_db=-5, build_s=0.00037):
    """One hand position to both ports: direct sound (left first), distinct echoes, short diffuse tail."""
    noise = rng.standard_normal((2, SR // 4))
    hz, t, z = signal.stft(noise, SR, nperseg=256)
    decay = amp(-60 * t / along(ROOM_T60, hz)[:, None])
    build_up = 1 - np.exp(-t / build_s)
    tail = signal.istft(z * decay * build_up, SR, nperseg=256)[1]
    left, right = amp(tail_db) * tail / np.linalg.norm(tail[0])

    def sample(ms):
        return abs(round(ms * SR / 1000))

    left[0] += 1
    right[sample(lead_ms)] += 1
    for ms, left_db, right_db, lag_ms in ECHOES:
        arrival_ms = ms + sway_ms * rng.standard_normal()
        left[sample(arrival_ms)] += amp(left_db)
        right[sample(arrival_ms + lag_ms)] += amp(right_db)
    return left, right


def standing_waves(x):
    """Long ring of the room's own resonances, as decaying cosines alike at both ports."""
    t = np.arange(SR // 2) / SR
    response = np.zeros(len(t))
    for hz, db, t60_s in WALL_MODES:
        fade = amp(-60 * t / t60_s)
        response += 2 * amp(db) * np.cos(2 * np.pi * hz * t) * fade / fade.sum()
    return through(x, response)


def background(air_db=-71, apart_db=-7, waver_db=1.5):
    """Still room air as shaped noise, and the wavering hum of an appliance."""
    mid, side = (unit(through(rng.standard_normal(N), ring(AIR_SPECTRUM))) for _ in range(2))
    side = amp(apart_db) * side
    t = np.arange(N) / SR
    hum = np.zeros(N)
    for hz, db in HUM_TONES:
        level = amp(db + waver_db * wobble(8.9))
        hum += level * unit(np.sin(2 * np.pi * hz * t + 0.56 * wobble(6.8)))
    return hum + amp(air_db) * np.array([mid + side, mid - side])


def amp(db):
    """Decibels to gain."""
    return 10 ** (np.asarray(db) / 20)


def unit(x):
    """x at rms 1."""
    return x / np.sqrt(np.mean(x ** 2) + 1e-20)


def along(points, hz):
    """(Hz, value) points read on a log axis."""
    f, v = np.transpose(points)
    return np.interp(np.log(hz + 1), np.log(f + 1), v)


def wobble(rate):
    """A smooth random curve, rate knots a second."""
    knots = rng.standard_normal(int(N * rate / SR) + 4)
    return map_coordinates(knots, [np.arange(N) * rate / SR])


def ring(spectrum, size=4096):
    """Minimum-phase impulse response with this spectrum, via the folded cepstrum."""
    gain = amp(along(spectrum, np.fft.rfftfreq(size, 1 / SR)))
    cepstrum = irfft(np.log(gain))
    cepstrum[1:size // 2] *= 2
    cepstrum[size // 2 + 1:] = 0
    return irfft(np.exp(rfft(cepstrum)))[:size // 2]


def through(x, response):
    """x convolved with a response, at its own length."""
    return signal.fftconvolve(x, response)[:len(x)]


def add(track, s, sound):
    """Mix a sound into a track at time s."""
    part = track[max(round(s * SR), 0):][:len(sound)]
    part += sound[:len(part)]


def scene():
    """The balloon in the room."""
    balloon = rubbing() + snaps() + squeals()
    return room(balloon) + standing_waves(balloon) + background()


def record(dry):
    """Each port colours the sound in its own way; nothing is kept above the band limit."""
    colours = (LEFT_COLOUR, RIGHT_COLOUR)
    ports = np.array([through(x, ring(colour)) for x, colour in zip(dry, colours)])
    size = next_fast_len(N + SR // 2)
    passband = np.fft.rfftfreq(size, 1 / SR) < TOP_HZ
    return irfft(rfft(ports, size) * passband, size)[:, :N]


dry = scene()
out = record(dry)
store_wav(out)
```